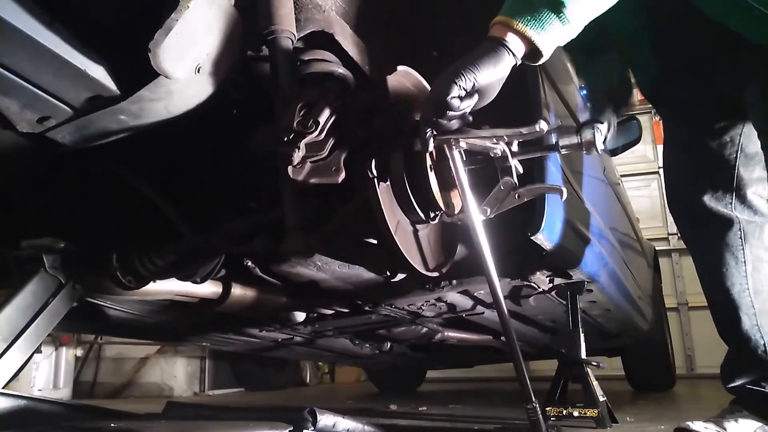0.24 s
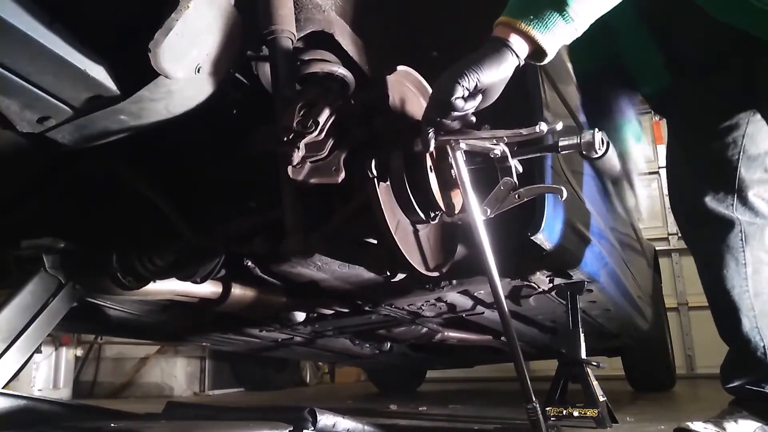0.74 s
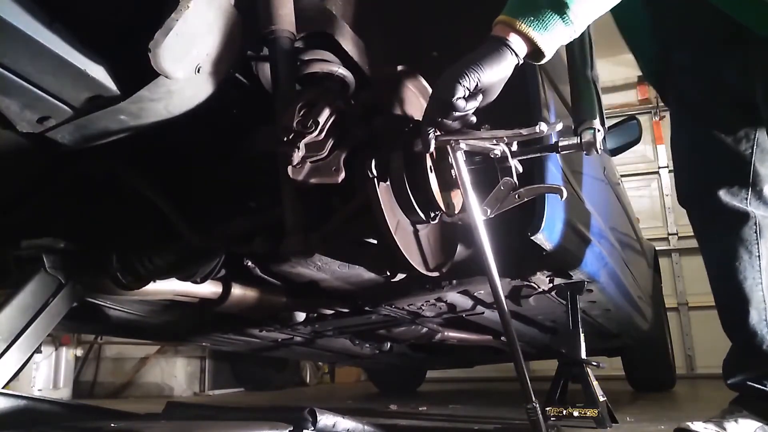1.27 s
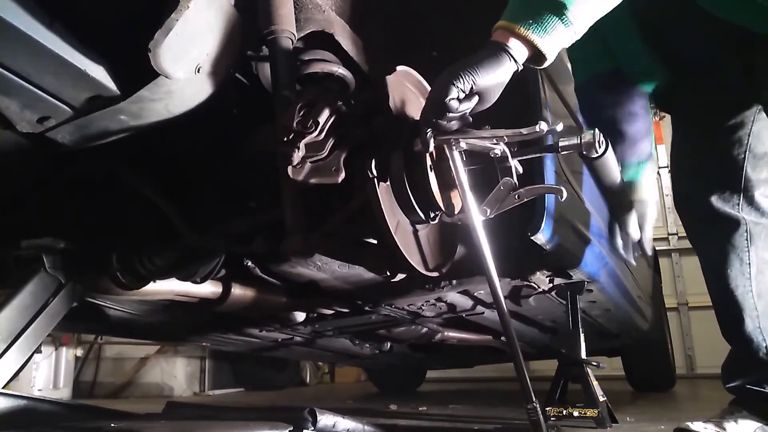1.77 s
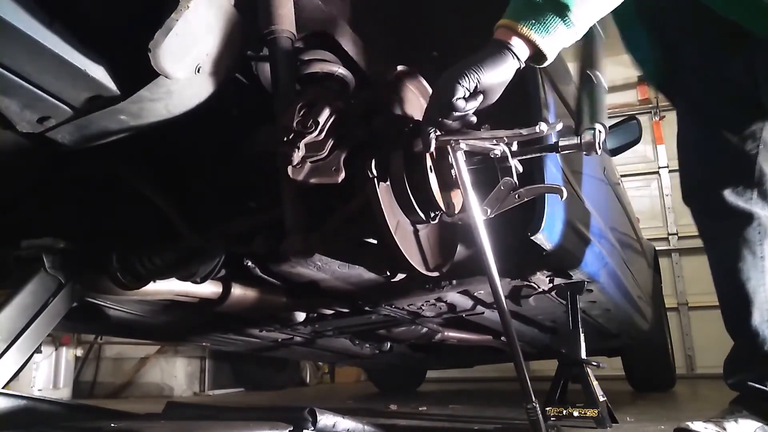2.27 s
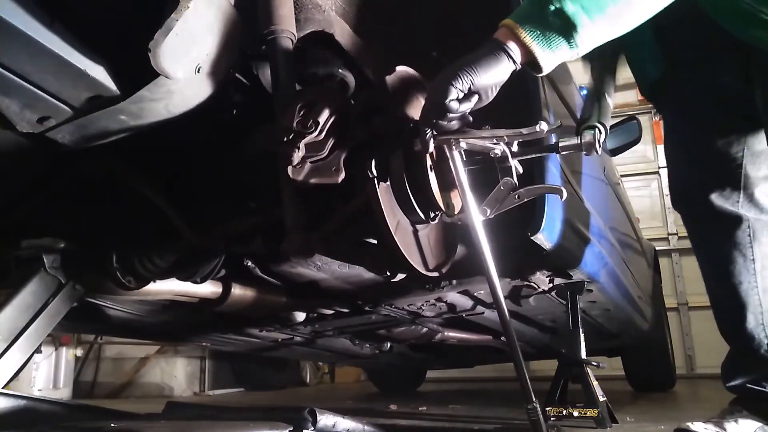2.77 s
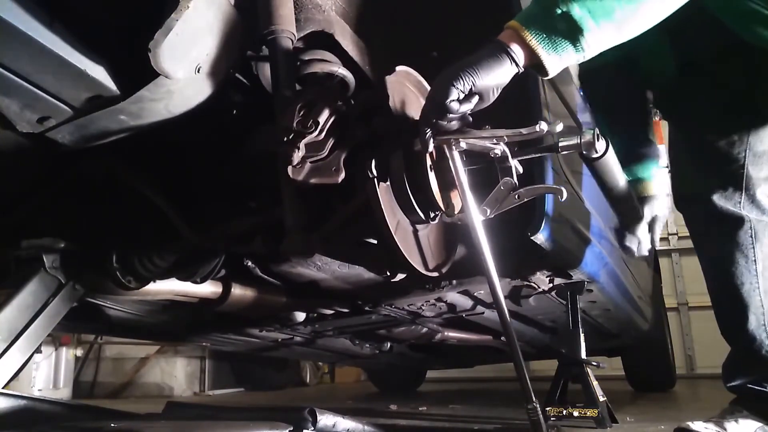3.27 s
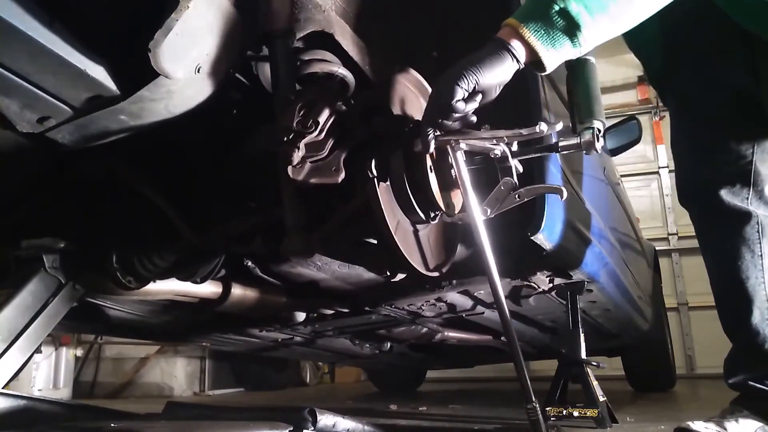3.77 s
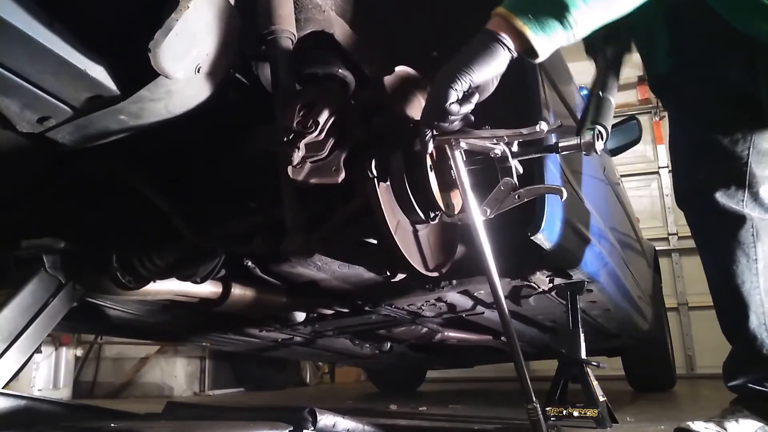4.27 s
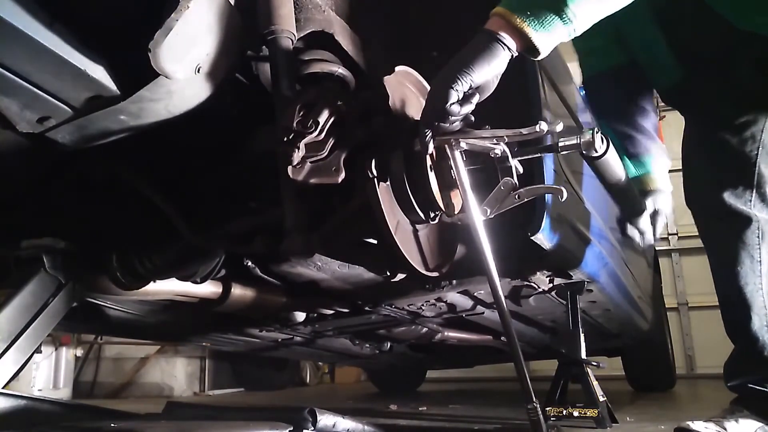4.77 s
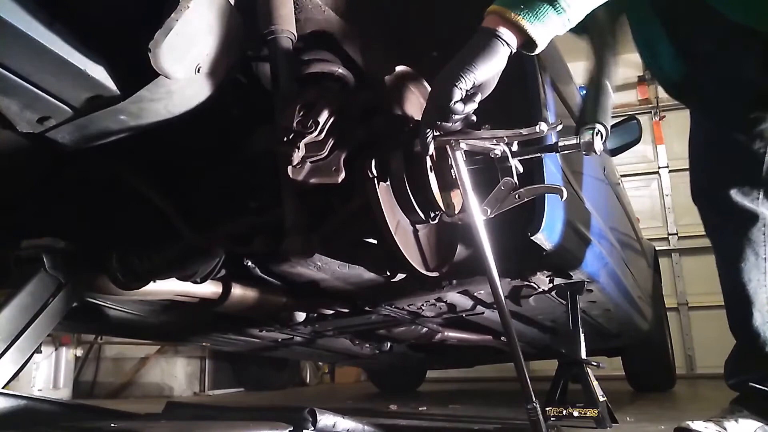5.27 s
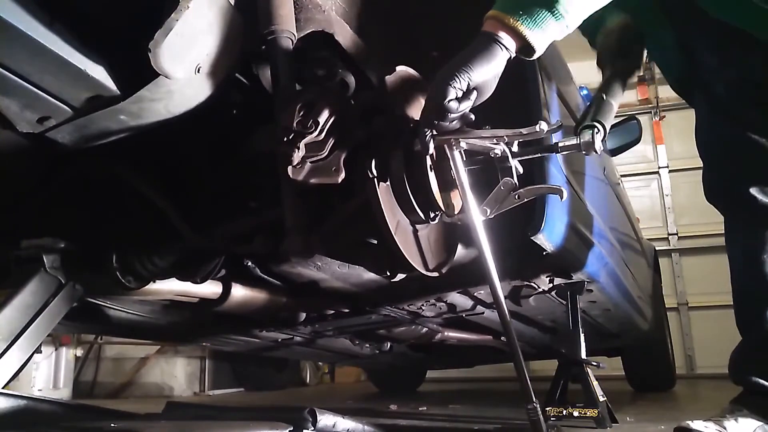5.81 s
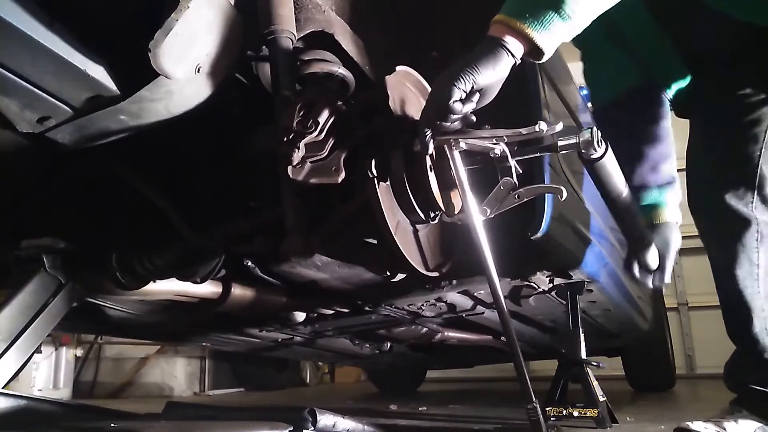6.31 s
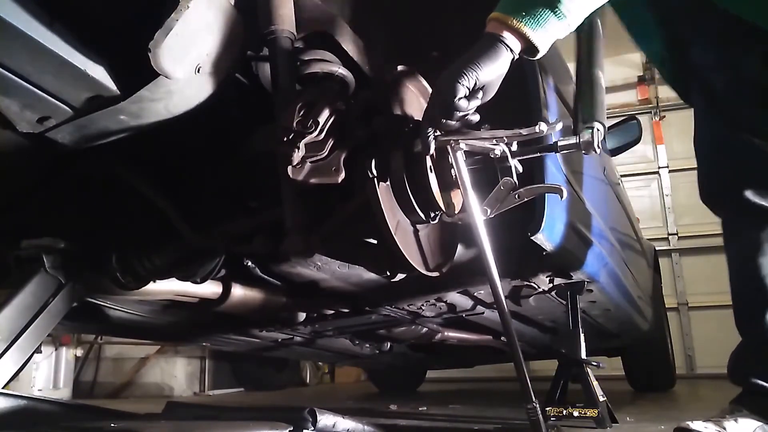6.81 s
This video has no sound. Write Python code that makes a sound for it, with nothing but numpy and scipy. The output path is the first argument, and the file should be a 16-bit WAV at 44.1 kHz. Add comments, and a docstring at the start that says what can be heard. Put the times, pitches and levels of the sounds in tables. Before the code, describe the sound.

Under a car in a garage, close stereo microphone. A huge metal crash comes almost at once, rattling and ringing for about half a second. Then a steel handle is worked back and forth: clanks, clunks and quick runs of bright ratchet ticks, with dull low knocks from the suspension. Near the end a second, slightly softer crash hits, followed by small clinks and faint ticks over quiet room noise.

```python
"""Two very hard metal crashes ring out; between them a steel handle clanks, its ratchet ticks, a car knocks.
A puller is worked on a stuck car hub in a garage, heard from under the car.
Contacts are short noise bursts followed by ringing noise, coloured by filters; hub and spring add dying sines.
Quiet room noise and a faint hum lie behind. A limiter holds the crashes down and faint tails are suppressed."""
import sys
import numpy as np
from scipy import signal
from scipy.fft import rfft, irfft
from scipy.io import wavfile
from scipy.ndimage import uniform_filter1d

SR = 44100
rng = np.random.default_rng(int(sys.argv[2]) if len(sys.argv) > 2 else 0)


def transcribe(u):
    """Save the signal u as a 16-bit wav file named by the first command-line argument.

    u: samples, shape (n,) or (channels, n), limited to [-1, 1]; the rate is SR.
    q: integer samples, one column per channel.
    """
    v = np.clip(np.atleast_2d(u).T, -1, 1)
    q = np.round(v * 32767).astype(np.int16)
    wavfile.write(sys.argv[1], SR, q)


N = 310905
TIME = np.arange(N) / SR   # time in the whole scene [s]
AGE = np.arange(SR) / SR   # time since a contact [s]; each sound is kept for one second

# The two very hard blows: (time [s], level [dB], brightness [dB], after-ring [dB])
BANGS = [(0.3372, -3, -1.5, -0.5), (6.085, -4.5, -2, -1)]
# How long the ring takes to die in the garage: (frequency [Hz], time to lose 60 dB [s])
RING_T60 = [(80, 1.03), (120, 0.65), (800, 0.52), (2000, 0.61), (8000, 0.42), (12000, 0.3), (15000, 0.14)]
# How alike the left and right sides of the ring are: (frequency [Hz], likeness [-1 to 1])
LIKENESS = [(50, 0.4), (140, 0.92), (280, 0.85), (550, 0.25), (1200, -0.011)]


def hub(crash_db=11.0, modes_db=-10.5, rattle_hz=6200.0):
    """The hard blows: the whole wheel corner crashes and rattles on, its strongest modes standing out."""
    # Modes of hub, shield and suspension: (frequency [Hz], level [dB], time to lose 60 dB [s])
    hub_modes = [(128, -3.5, .95), (155.8, 2.5, 0.85), (250, 8.5, 0.56), (339, 8.5, 0.55), (411, 5.5, .62),
                 (1032, -8, 0.6), (1103, -6, 0.6), (1520, -2, 0.5), (1558, -2, 0.5)]
    # The coil spring sings on softly: (frequency [Hz], level [dB], time to lose 60 dB [s])
    spring_modes = [(260, -58, 3.5), (389, -44, 2.0)]
    # Broad colour of a hard blow: (frequency [Hz], level [dB per Hz])
    bang_colour = [(42, -33.5), (60, -17.5), (100, -28), (130, -9), (400, -6), (490, -10.5), (800, -16.5),
                   (1520, -11.5), (2500, -17.5), (4700, -11.5), (7200, -17), (15000, -26.5), (16000, -48)]
    # How long the crash rings: (frequency [Hz], time to lose 60 dB [s])
    bang_t60 = [(80, 1.05), (120, .63), (900, .5), (1600, .52), (5000, .48), (8000, .31), (15000, .24)]
    # Own pitch of each rattling part, jaws or shield:
    # (frequency [Hz], width [Hz], height above the broad colour [dB])
    rattle_peaks = [(1130, 200, 10.5), (1484, 180, 13), (2180, 250, 8.5), (4800, 920, 13.5)]

    build_up = 1 - np.exp(-AGE / 0.0079)
    body = from_db(modes_db) * modes(hub_modes) * build_up
    tones = np.zeros((2, N))
    for s, db, bright_db, ring_db in BANGS:
        # the spring sings equally loudly after both blows
        add(tones, s, from_db(db + ring_db) * body + modes(spring_modes))

    ring = after_ring(bang_t60, build_s=0.0027, partials_db=4.5)
    crash = blows(BANGS, ring, contact_s=0.0057, pan_db=1.0, alike=0.12, hinge_hz=2000, thin_hz=603)

    repeats = rattled(BANGS, span_s=0.27, first_db=-6.5, fade_db=-20.5, ring_change_db=-13.0, count=16)
    # the loose parts strike in turn, so the colour of the crash keeps changing
    rattle = 0
    for part, peak in enumerate(rattle_peaks):
        part_repeats = repeats[part::len(rattle_peaks)]
        strikes = blows(part_repeats, ring, contact_s=0.0025, pan_db=-6.0, alike=0.16,
                        hinge_hz=1970, thin_hz=596)
        rattle = rattle + coloured(strikes, bang_colour, [peak])
    # these light, soft contacts reach neither the deep bass nor the top
    rattle_band = signal.butter(4, [260, rattle_hz], "band", fs=SR, output="sos")
    rattle = signal.sosfilt(rattle_band, rattle)
    return from_db(crash_db) * (coloured(crash, bang_colour) + rattle) + tones


def handle():
    """The steel handle clunks at one end of its swing; at the other it scrapes and clanks."""
    # It drops against its stop as the back swing starts:
    # (time [s], level [dB], brightness [dB], after-ring [dB])
    clunk_times = [(1.958, -10, 9.5, 2.5), (3.355, -11.5, 4, -15), (3.362, -8, 4, 1.5),
                   (4.9045, -9.5, 10, 1.5)]
    # It takes up its slack: (time [s], level [dB], brightness [dB], after-ring [dB])
    clank_times = [(1.432, -14, -9, 1.5), (1.927, -25, 14.5, 10.5), (2.631, -27.5, -3, 9),
                   (2.648, -16, -10, 1), (3.327, -23.5, 10, 1), (4.093, -8.5, -3, 1), (5.698, -12, -8.5, 3)]
    # It scrapes in its socket before it takes load: (middle [s], half length [s], level [dB])
    scrape_times = [(0.039, 0.074, -59.5), (5.627, 0.033, -37), (5.686, 0.053, -32)]
    # Broad colour of clunks and scrapes: (frequency [Hz], level [dB per Hz])
    clunk_colour = [(30, -8.5), (90, 1), (160, 7.5), (500, -4), (1100, -4.5), (2100, 2), (3200, -3),
                    (4600, -1), (6400, -1), (8000, -10.5), (12000, -24.5), (16000, -46.5)]
    # Broad colour of clanks: (frequency [Hz], level [dB per Hz])
    clank_colour = [(30, -5.5), (250, -1), (650, -7), (1800, 0), (3500, -4.5), (5200, 4.5), (6500, 0),
                    (8800, -17), (12000, -16), (16000, -32)]
    # Steel resonances in a clunk: (frequency [Hz], width [Hz], height above the broad colour [dB])
    clunk_peaks = [(55.5, 16, 10), (770, 220, 4), (2060, 130, 7.5), (3720, 140, 16.5), (3766, 110, 15),
                   (5780, 290, 8), (12550, 200, 15)]
    # Steel resonances in a clank: (frequency [Hz], width [Hz], height above the broad colour [dB])
    clank_peaks = [(1150, 230, 6.5), (1490, 130, 6.5), (2928, 140, 6.5), (4290, 210, 7), (4730, 230, 6.1),
                   (5474, 360, 6.1), (6450, 130, 6.7), (8190, 200, 15), (9740, 160, 15), (11340, 280, 12),
                   (13340, 140, 21)]
    # The rubbing socket rasps as rough noise, broadly stronger around 2 kHz:
    # (frequency [Hz], width [Hz], height above the broad colour [dB])
    scrape_peaks = [(2160, 830, 5.5)]

    ring = after_ring(RING_T60, build_s=0.004, partials_db=4.5)
    clunks = blows(clunk_times, from_db(-8.0) * ring, contact_s=0.004, pan_db=1.0, alike=0.14,
                   hinge_hz=3080, thin_hz=700)
    clunking = from_db(1.0) * coloured(clunks, clunk_colour, clunk_peaks)

    # two weaker strikes follow each clank as the handle seats
    seating = rattled(clank_times, span_s=0.018, first_db=-4.0, fade_db=-5.5, ring_change_db=-11.5, count=2)
    clanks = blows([*clank_times, *seating], from_db(-10.0) * ring, contact_s=0.0039, pan_db=1.5,
                   alike=0.13, hinge_hz=3100, thin_hz=720)
    clanking = from_db(-3.5) * coloured(clanks, clank_colour, clank_peaks)

    rubbing = sum(from_db(db) * swell(s, half_s) for s, half_s, db in scrape_times)
    roughness = from_db(1.6 * flutter(150.8))
    scrapes = rubbing * roughness * stereo_noise(N, LIKENESS)
    return clunking + clanking + coloured(scrapes, clunk_colour, scrape_peaks)


def ratchet(head_db=1.0, ring_db=-14.5, wheel_db=-2.5, ping_db=-33.5, full_ping_db=-35.5, spread_db=1.0):
    """Each tick joins a click of the ratchet head, a bright toothed-wheel chink and a sprung-pawl ping."""
    # The pawl drops over one tooth after another on each back swing: (time [s], level [dB])
    tick_times = [(0.9394, -40.5), (0.993, -39.5), (1.0462, -37.5), (1.1158, -37.5), (2.1052, -25),
                  (2.156, -21), (2.2085, -23.5), (2.2525, -24.5), (2.3104, -25.5), (2.389, -26.5),
                  (3.5059, -23), (3.5529, -22), (3.5982, -20.5), (3.6423, -19.5), (3.683, -20), (3.74, -22),
                  (5.1364, -22), (5.2004, -20.5), (5.2615, -22), (5.3245, -24), (5.391, -23), (6.5835, -35),
                  (6.6425, -36), (6.69, -39), (6.7378, -39), (6.7982, -41), (6.8487, -44.5),
                  (6.9077, -44.5)]
    # Broad colour of the click: (frequency [Hz], level [dB per Hz])
    tick_colour = [(200, -30), (2200, -3.5), (4500, -4), (6500, 2.5), (8600, -9.5), (10800, -7.5),
                   (12800, -18), (16000, -24)]
    # Steel resonances in the click: (frequency [Hz], width [Hz], height above the broad colour [dB])
    tick_peaks = [(3730, 200, 4.6), (5700, 393, 5.13), (7130, 130, 7.2), (11150, 400, 11)]
    # Colour of the toothed wheel's chink: (frequency [Hz], level [dB per Hz])
    wheel_chink = [(8500, -34), (9450, 1.5), (9750, 2), (10700, -38)]
    # Change of the chink's level, which fades during one swing: (time [s], level [dB])
    wheel_level = [(3.55, 2.5), (3.62, -20.5), (5.2, -1.5)]
    # Colour of the sprung pawl's thin ping: (frequency [Hz], level [dB per Hz])
    pawl_ping = [(6000, -30), (14000, -10), (14900, 2), (15300, 5.5), (16000, -9.5)]

    ring = after_ring(RING_T60, build_s=0.0036, partials_db=2.5)
    ring = ring * (from_db(ring_db) + from_db(-4.0) * dying(0.067))
    clicks = [(s, head_db + db, 0, 0) for s, db in tick_times]
    head = blows(clicks, ring, contact_s=0.00095, pan_db=6.5, alike=0, hinge_hz=5000, thin_hz=3900)
    tail = stereo_noise(len(AGE), LIKENESS) * from_db(-15.0) * dying(0.41)

    def chinks(levels_db, pan_db):
        """No two teeth catch with quite the same force."""
        rows = [(s, db + rng.normal(0, spread_db), 0, 0) for (s, _), db in zip(tick_times, levels_db)]
        return blows(rows, tail, contact_s=0.0027, pan_db=pan_db, alike=0.2, hinge_hz=5000, thin_hz=3570)

    wheel_levels = [wheel_db + db + np.interp(s, *np.transpose(wheel_level)) for s, db in tick_times]
    wheel = chinks(wheel_levels, pan_db=11.5)
    # apart from that small chance, only the lightest ticks ping more softly
    ping_levels = [ping_db + min(db - full_ping_db, 0) for _, db in tick_times]
    pawl = chinks(ping_levels, pan_db=15.5)
    return coloured(head, tick_colour, tick_peaks) + coloured(wheel, wheel_chink) + coloured(pawl, pawl_ping)


def clinks():
    """Short bursts whose ring dies quickly at first: loose parts, and second impacts of the handle."""
    # Clinks of loose parts after the hard blows and second impacts after the handle's clunks:
    # (time [s], level [dB], brightness [dB], after-ring [dB])
    clink_times = [(.673, -33.5, -12.5, 6.5), (.720, -26, 12.5, 1.5), (.739, -29, 19.5, -19),
                   (.758, -31, 15, -7.5), (1.994, -17.5, -6, -5.5), (3.380, -21.5, 0.5, -9),
                   (4.937, -18, -9, -7.5), (6.420, -28, -4, 2.5), (6.461, -15.5, 4, -4.5)]
    # Broad colour of a clink: (frequency [Hz], level [dB per Hz])
    clink_colour = [(200, -9.5), (4000, -8.5), (5800, 3), (8000, -3), (12000, -13.5), (16000, -36.5)]
    # Steel resonance in a clink: (frequency [Hz], width [Hz], height above the broad colour [dB])
    clink_peaks = [(5760, 1700, 6.6)]

    ring = after_ring(RING_T60, build_s=0.003, partials_db=3.0)
    # a brief ring on top of the garage's longer tail
    ring = ring * (from_db(-6.5) + from_db(-9) * dying(0.5))
    impacts = blows(clink_times, ring, contact_s=0.0039, pan_db=4.5, alike=0.078, hinge_hz=5010, thin_hz=700)
    return coloured(impacts, clink_colour, clink_peaks)


def shield(level_db=-35.0, delay_s=0.29, half_s=0.11):
    """The thin brake shield shivers on in one rough band of noise as each crash dies."""
    band = signal.butter(2, [1400, 1640], "band", fs=SR, output="sos")
    shiver = signal.sosfilt(band, stereo_noise(N, LIKENESS))
    swells = sum(swell(s + delay_s, half_s) for s, *_ in BANGS)
    return from_db(level_db) * shiver / shiver.std() * swells


def knocks():
    """Soft, low knocks in the suspension: long, dull contacts, each with one weaker rebound."""
    # The load shifts: (time [s], level [dB], brightness [dB], after-ring [dB])
    knock_times = [(1.586, -31.5, 10, 7.5), (2.822, -25.5, 8, 13), (3.223, -48.5, -2.5, -9),
                   (3.769, -47, -5.5, 11.5), (4.484, -29.5, -0.5, 11.5), (4.796, -51.5, -8, 3)]
    # The suspension settles back, each value changing by:
    # (level [dB], brightness [dB], after-ring [dB])
    knock_bounce = (-8.5, -6, -3)
    # Broad colour of a knock: (frequency [Hz], level [dB per Hz])
    knock_colour = [(30, -22.5), (60, -9.5), (280, 4), (480, -5.5), (700, -23), (5500, -20), (16000, -58)]
    # Resonances in a knock: (frequency [Hz], width [Hz], height above the broad colour [dB])
    knock_peaks = [(152, 35, 12), (365, 49, 3.1)]

    ring = from_db(-25.5) * after_ring(RING_T60, build_s=0.01, partials_db=1.5)
    rows = bounced(knock_times, delay_s=0.044, change=knock_bounce)
    thuds = blows(rows, ring, contact_s=0.019, pan_db=-2.5, alike=0.41, hinge_hz=900, thin_hz=89)
    return coloured(thuds, knock_colour, knock_peaks)


def garage(floor_db=-62.5):
    """Quiet coloured room noise with a faint, wavering hum of sines that comes and goes."""
    # The hum swells now and then: (middle [s], half length [s], frequency [Hz], level [dB])
    hums = [(0.123, 0.15, 511, -62.5), (0.27, 0.13, 308, -51), (1.414, 0.13, 276, -45),
            (2.52, 0.2, 490, -53), (4.777, 0.069, 434, -54), (6.92, 0.13, 477, -56.5)]
    # Colour of the room noise: (frequency [Hz], level [dB per Hz])
    floor_colour = [(20, -16.5), (256, 2), (463, -2.5), (796, -13.5), (5880, -14.5), (16000, -47)]

    hum = sum(from_db(db) * swell(s, half_s) * np.sin(2 * np.pi * hz * TIME) for s, half_s, hz, db in hums)
    room = from_db(floor_db) * coloured(stereo_noise(N, LIKENESS), floor_colour)
    return room + hum * (0.5 + flutter(25.0))


def blows(table, ring, contact_s, pan_db, alike, hinge_hz, thin_hz, size=4096):
    """Each blow is a brief burst of chattering contact with the body's ring; its row sets its brightness."""
    track = np.zeros((2, N))
    # the contact swells to its peak at contact_s, then fades
    contact = (AGE[:size] / contact_s * np.exp(1 - AGE[:size] / contact_s)) ** 2
    pan = from_db([[pan_db / 2], [-pan_db / 2]])   # above 0 dB leans left
    thin = signal.butter(1, thin_hz, "high", fs=SR)
    hinge = signal.butter(1, hinge_hz, fs=SR)
    for s, db, bright_db, ring_db in table:
        burst = stereo_noise(size, [(1, alike)]) * contact * pan
        sound = from_db(ring_db) * ring
        # small parts radiate little bass: it comes later, from the car body
        sound[:, :size] += signal.lfilter(*thin, burst)
        # brightness tips the balance between lows and highs
        lows = signal.lfilter(*hinge, sound)
        highs = sound - lows
        tilted = lows * from_db(-bright_db / 2) + highs * from_db(bright_db / 2)
        add(track, s, from_db(db) * tilted)
    return track


def after_ring(t60s, build_s, partials_db, spacing_hz=23.0):
    """Crowded modes of steel and room, of uneven strength, build up; each band dies at its own rate."""
    spectrum = rfft(stereo_noise(len(AGE), LIKENESS))
    hz = np.arange(spectrum.shape[1]) * SR / len(AGE)
    # strong partials stand further apart and higher towards the treble
    place = 3000 * np.log1p(hz / 3000) / spacing_hz
    chance = np.clip(rng.standard_normal(len(hz)), -2, 2)
    uneven = np.interp(place, np.arange(len(hz)), chance)
    strength = from_db(partials_db * uneven * hz / (hz + 2000))
    spectrum = spectrum * strength / np.sqrt(np.mean(strength ** 2))
    centres = np.geomspace(80, 16000, 14)
    out = 0
    # each band fades smoothly into its neighbours
    for centre, share in zip(centres, np.eye(len(centres))):
        band = irfft(spectrum * at_hz(np.c_[centres, share], hz), len(AGE))
        out = out + band * dying(at_hz(t60s, centre))
    return out * (1 - np.exp(-AGE / build_s))


def modes(table):
    """Dying sines; each reaches the two sides in its own phase, with the spread set by LIKENESS."""
    out = 0
    for hz, db, t60 in table:
        apart = np.arccos(np.clip(at_hz(LIKENESS, hz), -1, 1)) * rng.choice([-1, 1])
        phase = rng.uniform(0, 2 * np.pi) + apart * np.array([[0.5], [-0.5]])
        out = out + from_db(db) * dying(t60) * np.sin(2 * np.pi * hz * AGE + phase)
    return out


def rattled(table, span_s, first_db, fade_db, ring_change_db, count):
    """Loose parts strike again at uneven moments after each blow, ever weaker."""
    rows = []
    for s, db, bright_db, ring_db in table:
        lateness = (np.arange(count) + rng.uniform(0.2, 1, count)) / count   # share of the span
        for late in lateness:
            level_db = db + first_db + fade_db * late
            rows.append((s + late * span_s, level_db, bright_db, ring_db + ring_change_db))
    return rows


def bounced(table, delay_s, change):
    """Every blow is followed by one rebound, changed by the given levels."""
    return np.vstack([table, np.add(table, (delay_s, *change))])


def coloured(x, colour, peaks=(), size=8192):
    """Filter of unit power: a broad colour with resonances standing on it."""
    hz = np.arange(size // 2 + 1) * SR / size
    lift = 1
    for centre, width, db in peaks:
        lift = lift + (from_db(db) ** 2 - 1) / (1 + (2 * (hz - centre) / width) ** 2) ** 2
    gain = from_db(at_hz(colour, hz)) * np.sqrt(np.abs(lift))
    cepstrum = irfft(np.log(gain))[:size // 2]
    cepstrum[1:] *= 2   # minimum phase: nothing sounds before the contact
    response = irfft(np.exp(rfft(cepstrum, size)))
    response = response / np.linalg.norm(response)
    return signal.oaconvolve(x, response[None], axes=1)[:, :N]


def stereo_noise(size, likeness):
    """White noise whose two sides are alike by the given table."""
    mid, side = rfft(rng.standard_normal((2, size)))
    alike = np.clip(at_hz(likeness, np.arange(len(mid)) * SR / size), -1, 1)
    shared = np.sqrt((1 + alike) / 2) * mid
    opposed = np.sqrt((1 - alike) / 2) * side * [[1], [-1]]
    return irfft(shared + opposed, size)


def flutter(width_hz):
    """Slow stereo chance with a spread of 1."""
    low_pass = signal.butter(2, width_hz, fs=SR, output="sos")
    slow = signal.sosfilt(low_pass, rng.standard_normal((2, N)))
    return slow / slow.std()


def swell(middle_s, half_s):
    """A smooth rise and fall around a moment."""
    return np.cos(np.pi / 2 * np.clip((TIME - middle_s) / half_s, -1, 1)) ** 2


def dying(t60):
    """Envelope that loses 60 dB in t60 seconds."""
    return np.exp(-np.log(1000) * AGE / t60)


def add(track, s, sound):
    """Mix a one-second sound into the track from time s."""
    start = int(s * SR)
    track[:, start:start + len(AGE)] += sound[:, :N - start]


def at_hz(points, hz):
    """Read a table between its points on a log-frequency axis."""
    known_hz, values = np.transpose(points)
    return np.interp(np.log(np.maximum(hz, 1)), np.log(known_hz), values)


def from_db(db):
    """Decibels to gain."""
    return 10 ** (np.asarray(db) / 20)


def suppressed(x, threshold_db=-59.5, depth_db=-6.0, size=1024):
    """Noise suppressor: each narrow band is turned down as it sinks towards the threshold."""
    bins = signal.stft(x, nperseg=size)[2]
    power = np.mean(np.abs(bins) ** 2, axis=0)
    # smooth over neighbouring bands, then over time
    power = uniform_filter1d(uniform_filter1d(power, size=5, axis=0), size=3, axis=1) * size
    shut = 1 / (1 + (power / from_db(threshold_db) ** 2) ** 2)   # 0 is open, 1 is fully turned down
    return signal.istft(bins * from_db(depth_db * shut), nperseg=size)[1][:, :N]


def scene():
    """Everything that sounds around the hub."""
    return hub() + handle() + ratchet() + clinks() + shield() + knocks() + garage()


def record(dry, limit_db=-3.5, release_db_per_s=78.0, top=0.81, cutoff_hz=15900):
    """A limiter holds the hard blows down, peaks are rounded, faint tails suppressed, the top is cut."""
    power = uniform_filter1d(np.mean(dry ** 2, axis=0), size=441)   # over 10 ms
    over = np.maximum(10 * np.log10(np.maximum(power, 1e-12)) - limit_db, 0)
    # the level is pulled down at once and let go at a steady rate
    release = release_db_per_s * TIME
    held = np.maximum.accumulate(over + release) - release
    # smooth the gain over a few milliseconds
    limited = dry * from_db(-uniform_filter1d(held, size=128))
    rounded = limited / (1 + (limited / top) ** 6) ** (1 / 6)
    top_cut = signal.ellip(10, 0.3, 70, cutoff_hz, fs=SR, output="sos")
    return signal.sosfilt(top_cut, suppressed(rounded))


dry = scene()
out = record(dry)
transcribe(out)
```